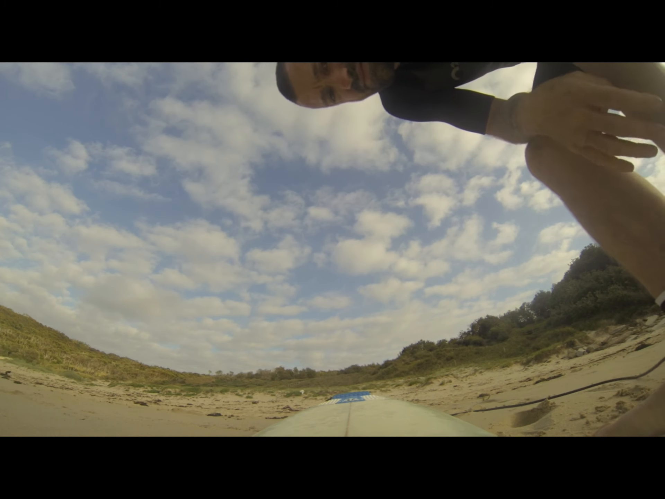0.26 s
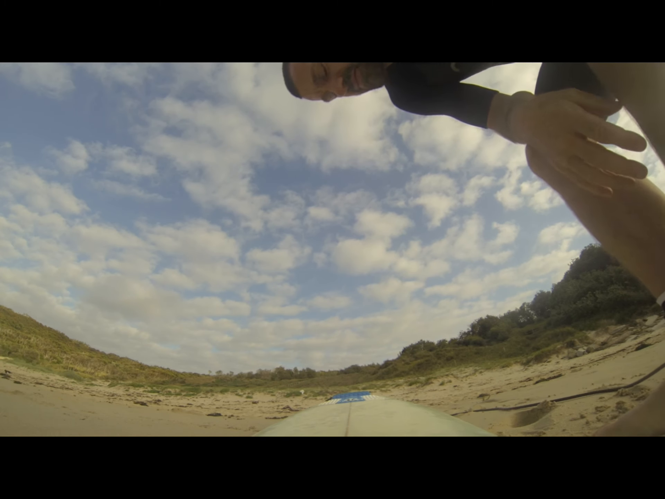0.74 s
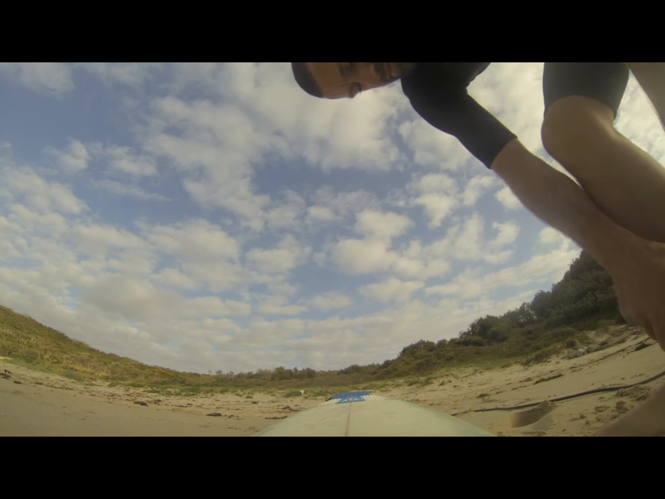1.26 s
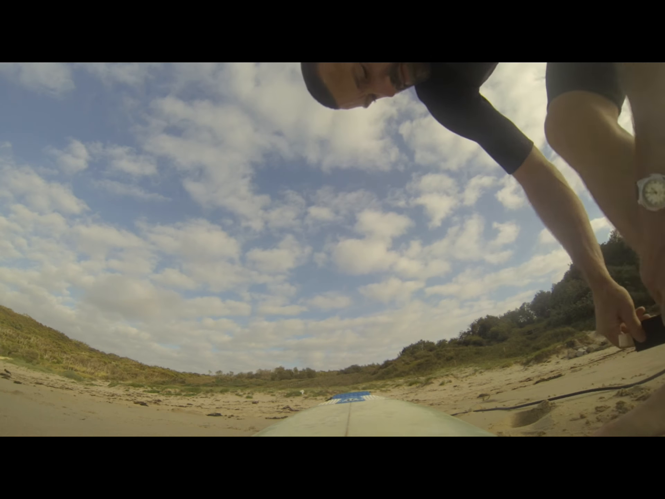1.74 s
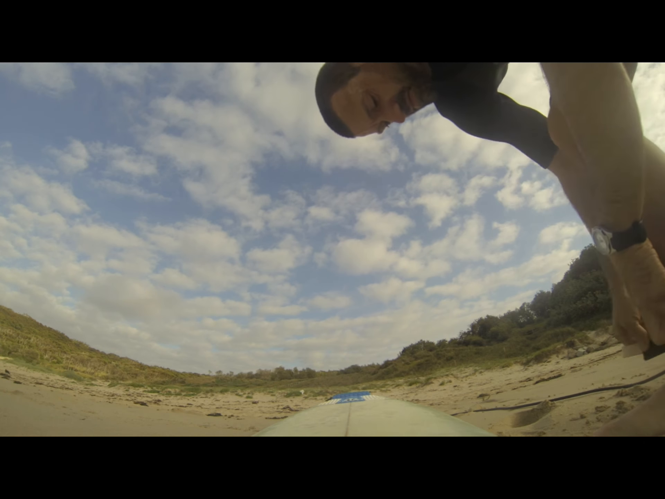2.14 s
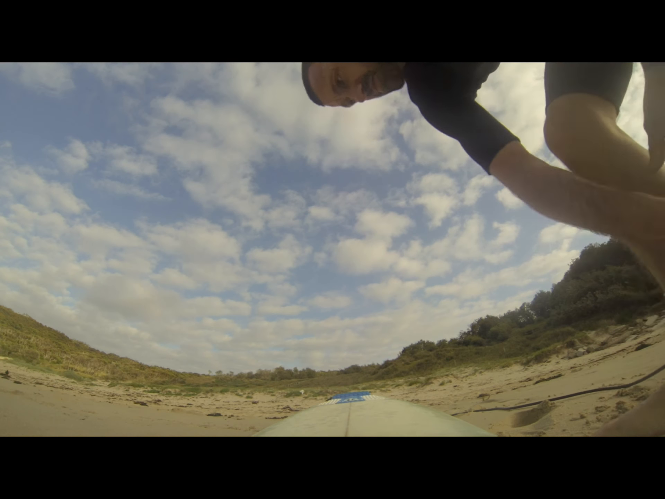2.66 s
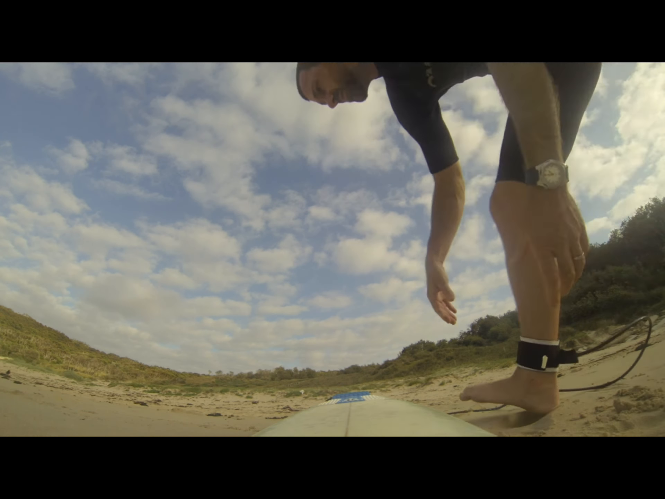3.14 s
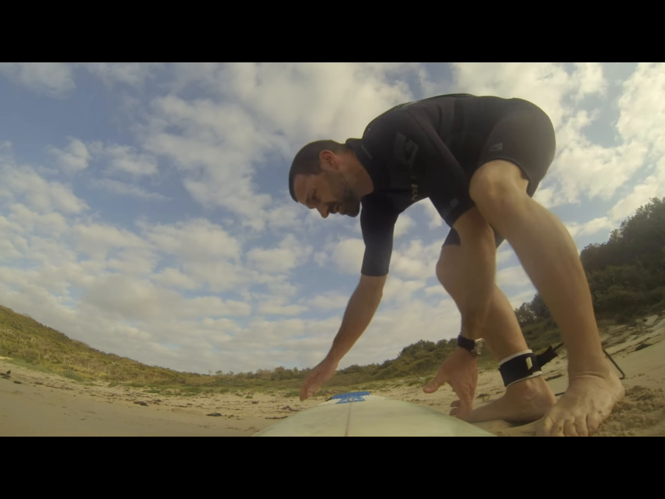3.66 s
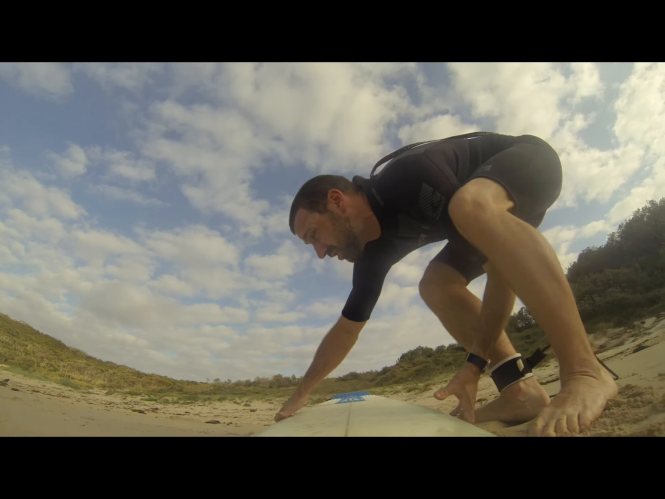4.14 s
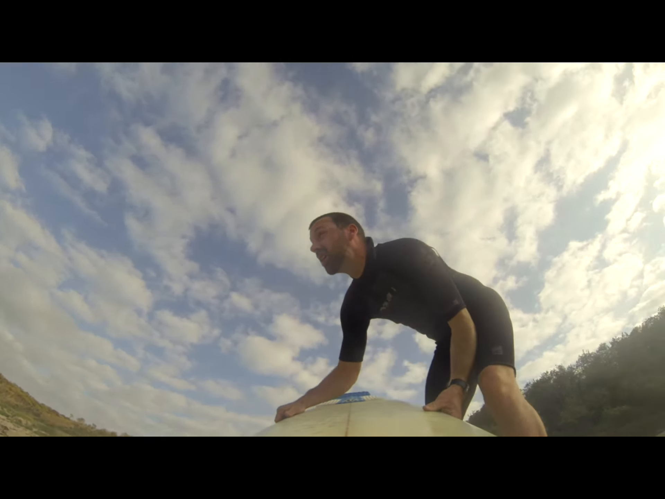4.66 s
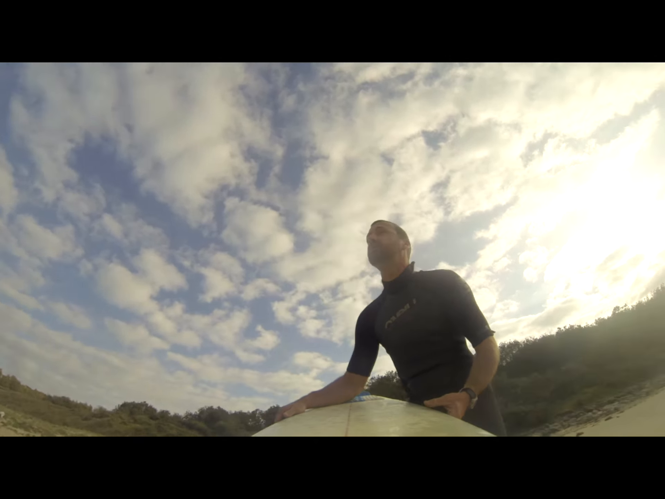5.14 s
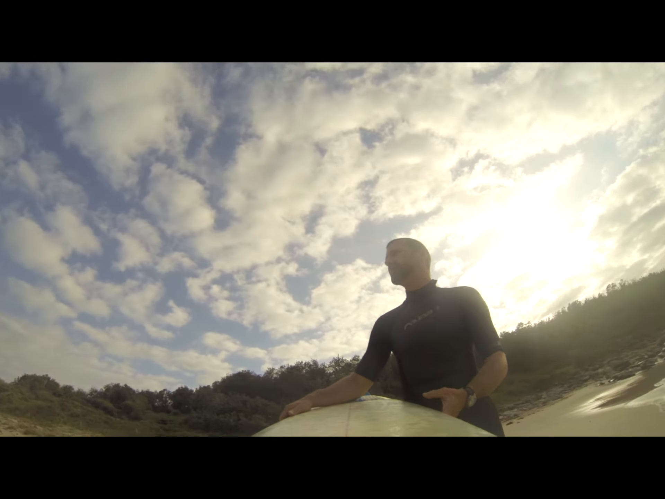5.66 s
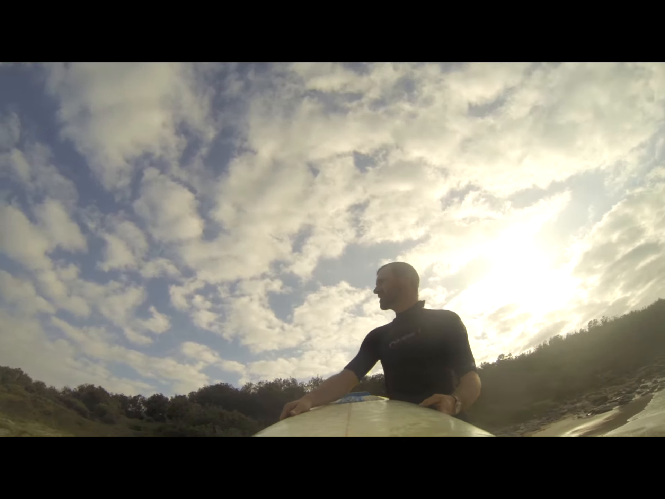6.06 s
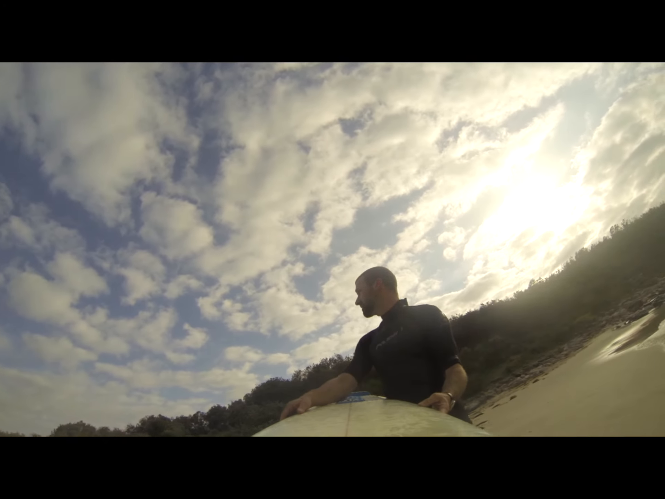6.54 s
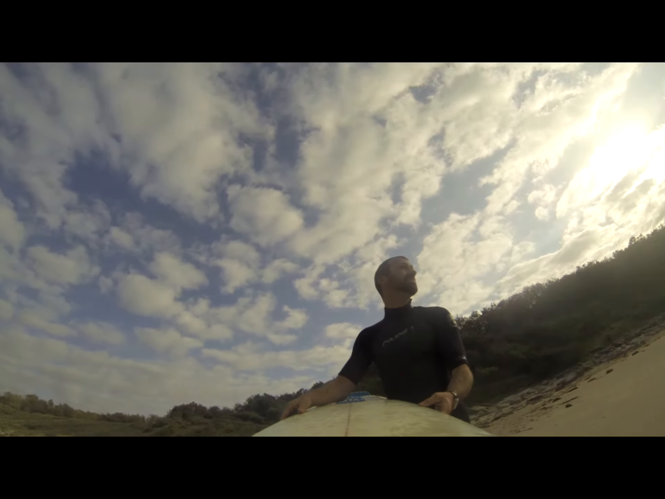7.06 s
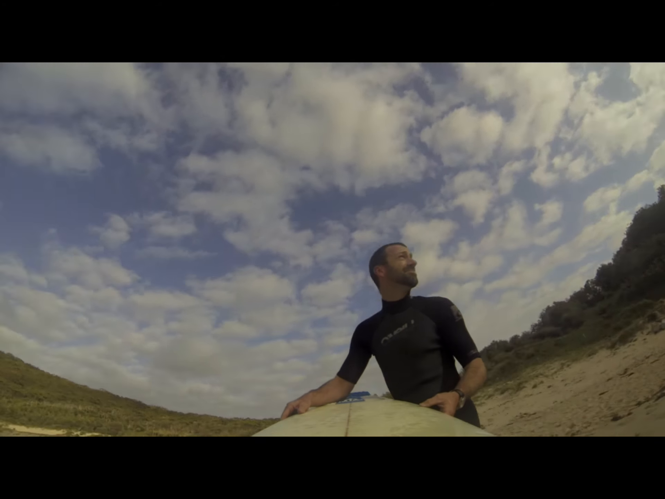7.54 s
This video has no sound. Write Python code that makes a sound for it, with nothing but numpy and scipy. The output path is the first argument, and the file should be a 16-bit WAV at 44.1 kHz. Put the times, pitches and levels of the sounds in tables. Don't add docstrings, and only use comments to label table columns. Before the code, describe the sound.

Heard from inside a sealed case fixed to a surfboard on a beach, foam hisses dully and recedes. A hook-and-loop strap rips in stuttering crackles, quiet and muffled. Then hands seize and lift the board: hollow plastic knocks, very low booms and jolts, dry ticks and palms rubbing sandy wax. The surf ducks after the hardest hits and climbs back. Creaks and two short squeaks come near the end.

```python
import sys
import numpy as np
from scipy import signal
from scipy.io import wavfile
from scipy.ndimage import uniform_filter1d

SR = 44100
rng = np.random.default_rng(int(sys.argv[2]) if len(sys.argv) > 2 else 0)


def gain_from_db(level_db):
    decades = np.asarray(level_db, float) / 20
    return 10 ** decades


def log_audio(samples):
    frames = np.atleast_2d(samples).T
    limited = np.clip(frames, -1, 1)
    pcm = np.round(limited * 32767).astype(np.int16)
    wavfile.write(sys.argv[1], SR, pcm)


N = 343980
T = np.arange(N) / SR

# t/s, level/dB, brightness/(dB per octave)
WASH = [(0, -36.5, -1), (.6, -35, 0.5), (1.2, -39.5, 0.5), (1.9, -49, -1), (2.5, -53.5, 1),
        (3.2, -51, -2.5), (3.9, -51.5, -2), (4.6, -38.5, -1.5), (5.199, -39.5, -2), (5.701, -50.5, 6),
        (6.3, -52, 4.5), (6.9, -45.5, 2.5), (7.4, -35, -2), (7.8, -41.5, 1.5)]
# f/Hz, level/(dB per Hz)
WALL = [(90, -7.5), (260, -10.5), (520, -7.5), (600, -13.5), (850, -17), (1120, -10.5), (1300, 2.5),
        (1520, -2), (1780, -11.5), (3100, -25), (3600, -26), (8500, -41), (14000, -60.5), (15700, -71.5)]
# f/Hz, width/Hz, level/dB
WALL_PEAKS = [(2322, 9.3, 7), (3023, 320, 8), (5040, 100, 8), (6500, 110, 5.5), (7730, 200, 4.5),
              (10200, 770, 3), (13500, 700, 0)]
# f/Hz, level/(dB per Hz)
ROAR = [(40, -10), (120, 0.5), (300, -2.5), (410, -2), (550, -6.5), (850, -17), (1400, -13), (2000, -31.5),
        (4000, -35), (9000, -41.5), (15000, -50), (15700, -75)]
ROAR_DB, WHINE_DB, WHINE_HZ = -48.5, -81, 10645
CARRY_S, CARRIED_WHINE_DB = 4.3, -5

# f/Hz, width/Hz
FLEX_MODES = [(24, 11.4), (50, 7.1), (74, 4.6), (115, 8.3)]
TREMOR_DB = [-8.5, -7, -3.5, -15.5]
# start t/s, level/dB
FEET = [
    (.25, -33.5),
    (0.618, -33),
    (.92, -34),
    (1.298, -43),
    (1.548, -46.5),
    (1.98, -49),
    (2.35, -47.5),
    (2.7, -53.5),
]
# start t/s, length/s, level/dB
HEAVES = [(0, 0.27, -34), (2.45, 0.51, -49.5), (3.67, 0.17, -37), (3.899, 0.11, -14), (4.2, .04, -23),
          (4.58, 0.31, -23.5), (4.85, 0.28, -25), (5.221, 0.1, -16), (5.42, 0.16, -21), (5.7, 0.18, -23),
          (6.1, 0.18, -42), (6.45, 0.26, -23), (7.129, 0.068, -23.5)]
# start t/s, length/s, level/dB, mode favoured by the grip (1-3)
SHOVES = [(3.216, 0.032, -27, 1.9), (3.643, 0.047, -23.5, 2), (3.893, 0.064, -22, 1.35),
          (4.056, .12, -19, 1.2), (4.201, 0.054, -18.5, 1.96), (4.285, 0.19, -31, 1.98),
          (4.561, 0.11, -21, 0.99), (4.705, 0.066, -16, 1.8), (4.798, 0.051, -15.5, 1.43),
          (4.873, 0.096, -16.5, 1.02), (5.03, 0.081, -21, 1.46), (5.156, 0.048, -17.5, 1.87),
          (5.405, 0.064, -17, 1.94), (5.512, 0.23, -22.5, 1.39), (5.869, .16, -16, 1),
          (5.98, 0.046, -24, 3.1), (6.079, .15, -18.5, 1.95), (6.287, 0.095, -19, 0.98),
          (6.429, 0.077, -13.5, 1.55), (6.56, 0.13, -26, 1.3), (6.729, 0.11, -20, 1.1),
          (6.867, 0.045, -8, 2.55), (6.956, 0.13, -24.5, 2.7), (7.157, 0.086, -18.5, 0.93),
          (7.373, 0.076, -15.5, 1.32), (7.47, 0.089, -23, 2.45), (7.621, 0.05, -16.5, 1.16),
          (7.683, 0.086, -7.5, 3.57)]
# t/s, peak level/dB, f/Hz, first swing (up +, down -)
JOLTS = [(3.646, -20, 90, -0.75), (3.699, -22.5, 101, 1), (3.897, -15, 55, 0.99), (4.08, 3, 72, 0.21),
         (4.212, -6, 59, -0.97), (4.2675, -3, 57, 0.92), (4.75, -12.5, 70, -1.53), (5.159, -9, 73, -0.93),
         (5.468, -10, 71.7, 0.45), (5.881, -10, 55, -0.9), (6.031, -8, 74.5, 1), (6.111, -8, 70, 0.9),
         (6.455, 4.5, 66.6, -0.12), (6.885, 1, 54, 0.59)]
LIFT_S, RESTING_HZ, RESTING_WIDTH = 3.85, 30, 8.8
FOOT_S, HEAVE_RISE_S, HEAVE_FALL_DB_PER_S = 0.19, 0.03, 145
SHOVE_RISE_S, SHOVE_FALL_DB_PER_S, NEXT_MODE_DB, THIRD_MODE_DB = 0.012, 152, -10, -11

# f/Hz, width/Hz, level/dB
DECK = [(178, 41, 5.5), (254, 2.1, -12), (284.4, 17.8, 6), (389, 6.9, -3), (430.7, 34, 11), (514.6, 65, 18),
        (606, 72, 8), (671, 17, -6.5)]
# f/Hz, width/Hz, level/dB
CASE = [(850, 130, 2), (1010, 250, -10), (1330, 60, 25), (1378, 59, 23), (1481, 63, 29), (1580, 80, 26),
        (1773, 25, 14.5), (1950, 450, -21.5)]
# f/Hz, width/Hz, level/dB
GRIT = [(2170, 630, 18.5), (2530, 620, 3.5), (2777, 110, 3), (3090, 43, -13.5)]
# f/Hz, width/Hz, level/dB
SPRAY = [(4110, 160, 0.5), (5130, 830, 1), (7500, 1800, -4.5)]
# t/s, case peak level/dB, deck level/dB, deck f/Hz, grit level/dB
KNOCKS = [(3.6457, -29.5, -40, 172, -59), (3.695, -21, -30, 253, -48), (3.727, -26, -47, 400, -48),
          (3.741, -29, -45, 400, -46), (3.865, -29.5, -36, 175, -54), (3.897, -31, -28.5, 264, -56),
          (3.9544, -19.5, -21, 269, -46), (4.131, -19, -25.5, 172, -54), (4.2182, -17.5, -18, 415, -54),
          (4.2661, -25.5, -32.5, 172, -49), (4.6406, -10.5, -12.5, 390, -51),
          (4.7375, -14.5, -21, 568, -41), (4.9288, -8, -43, 579, -49), (5.089, -11, -18, 544, -36),
          (5.4748, -10, -16, 511, -63), (5.877, -27, -29, 511, -52), (5.9532, -18, -15, 533, -51),
          (6.042, -2, -6, 640, -34.5), (6.875, -19, -22, 395, -49), (4.805, -26, -32, 500, -48),
          (4.6355, -26, -30, 450, -52), (5.081, -20, -30, 544, -44), (5.099, -13, -20, 560, -44),
          (5.435, -24, -14, 480, -55), (5.502, -19, -20, 500, -52), (6.025, -20, -22, 500, -50),
          (4.204, -23, -21.5, 450, -55), (4.152, -26, -35, 300, -49), (3.939, -26, -33, 290, -49),
          (.527, -45, -30, 510, -65)]
# t/s, peak level/dB
TICKS = [(3.698, -50), (3.73, -51), (3.74, -50), (3.865, -51), (3.964, -37), (3.975, -49), (3.986, -43),
         (4.008, -51.5), (4.032, -52), (4.081, -50), (4.0863, -37.5), (4.102, -52), (4.165, -51),
         (4.221, -39), (4.231, -44), (4.269, -36), (4.274, -34), (4.28, -36.5), (4.566, -55), (4.639, -52),
         (4.738, -52), (4.749, -45), (4.758, -42), (4.601, -54), (4.839, -45), (4.886, -48), (4.949, -48),
         (4.96, -50), (5.023, -46), (5.075, -45), (5.093, -45), (5.162, -43.5), (5.168, -42), (5.228, -51),
         (5.278, -49), (5.4715, -42), (5.494, -45), (5.8866, -41), (6.013, -40), (6.036, -41),
         (6.044, -33.5), (6.102, -48), (6.1152, -42.5), (6.122, -43), (6.46, -47), (6.507, -45),
         (6.9, -35.5), (7.213, -50)]

# start t/s, length/s, crackle level/dB, dull part level/dB
STRAP = [(1.311, .004, -57, -45), (1.324, 0.0071, -50.5, -40), (1.334, 0.0045, -51.5, -42),
         (1.346, 0.013, -48.5, -42), (1.362, .006, -54, -44), (1.372, .008, -44.5, -36),
         (1.382, .009, -51.5, -40), (1.395, .04, -49.5, -41), (1.437, .05, -51.5, -44),
         (1.491, 0.02, -50.5, -42), (1.517, .005, -51, -41), (1.531, .003, -56, -46),
         (1.539, .004, -55, -45), (1.548, 0.026, -50.5, -41), (1.577, 0.032, -48.5, -39),
         (1.608, .04, -46, -40), (1.649, .028, -43, -33), (1.685, .015, -46, -35), (1.703, .014, -51, -37),
         (1.721, .004, -54, -40), (1.729, .028, -51.5, -34), (1.765, .003, -58, -44),
         (1.775, .009, -55.5, -33), (1.788, .007, -57, -39), (1.81, .014, -54.5, -33),
         (2.315, .012, -66, -62), (2.459, 0.042, -60.5, -58), (2.545, .01, -66, -60)]
# f/Hz, level/(dB per Hz)
STRAP_TONE = [(900, -56), (1400, 6.5), (2000, -5), (3250, -7.5), (3550, -11.5), (6200, -12.5), (9000, -21),
              (14000, -30.5), (15600, -48)]
PULL_RISE_S, PULL_SWELL_DB_PER_S, PULL_FALL_DB_PER_S = 0.003, 30, 2500

# start t/s, length/s, pressure/dB, nearness to the mount/dB, sand level/dB
STROKES = [(3.708, 0.035, -49, 11, 12), (3.899, 0.09, -39.5, 1.5, 1), (4.037, .055, -38, 6, 4),
           (4.106, 0.084, -32, 0.5, -6.5), (4.183, 0.11, -36, -12, -14), (4.631, 0.04, -20.5, -21.5, -35),
           (4.737, 0.016, -24, -3, -6), (4.8, 0.31, -32.5, 0, -9), (5.04, 0.013, -31.5, 3, 5),
           (5.066, 0.033, -27, 9, 2.5), (5.115, 0.14, -23, -6, -32), (5.255, 0.13, -31, 4.5, -2),
           (5.401, 0.099, -24, -6.5, -17), (5.536, 0.16, -36, 1.5, -2), (5.932, 0.18, -29, -3, -7),
           (6.297, 0.16, -47, -14, -3), (6.662, 0.15, -30, -8, -17), (6.872, 0.09, -28, 3, -22),
           (6.955, 0.053, -30.5, 12, -18), (7.011, 0.072, -22.5, -1.5, -25), (7.075, 0.057, -23.5, 5, -21),
           (7.129, 0.099, -30, 4.5, -20), (7.246, 0.29, -37.5, 6.5, -10), (7.386, 0.062, -30, 0, -29),
           (7.638, 0.14, -20.5, -11, -33)]
# start t/s, length/s, level/dB
SIFTS = [
    (3.729, .015, -64),
    (4.62, 0.13, -67),
    (4.798, 0.14, -65),
    (5.0, .16, -65),
    (5.33, 0.086, -58.5),
    (5.523, .2, -63.5),
    (6.37, .3, -64.5),
    (7.3, 0.44, -62.5),
]
STROKE_RISE_S, STROKE_FALL_DB_PER_S = 0.013, 399
CARRY_DB, CARRY_MOUNT_DB, CARRY_SAND_DB = -41, -1.5, -2

# t/s of the jolt, fall/dB, hold/s
DUCKS = [
    (3.975, 8, .08),
    (4.087, 7, .07),
    (4.285, 25, .15),
    (4.765, 3, .03),
    (5.172, 6, .12),
    (5.95, 3, .02),
    (6.052, 8, .04),
    (6.125, 11, .07),
    (6.905, 16, .03),
]
RECOVERY_DB_PER_S = 72
NEAR_DUCK = 0.64

# start t/s, length/s, f/Hz, level/dB
SINGING = [
    (5.09, 0.03, 568, -19.5),
    (5.11, 0.047, 448, -19),
    (5.16, .06, 395, -24),
    (5.074, .04, 1580, -17),
    (5.128, .06, 520, -23),
    (5.19, .05, 545, -27),
    (5.15, .028, 315, -21),
    (5.166, 0.15, 254.5, -22.5),
    (5.424, 0.039, 266, -27.5),
    (7.018, 0.062, 280, -28.5),
]
# start t/s, length/s, f/Hz, level/dB, octave level/dB
SQUEAKS = [
    (7.061, 0.076, 715, -24.5, -31),
    (7.145, 0.061, 671, -18.5, -14),
]
SQUEAK_BOWL = 0.13
LET_GO_S, LET_GO_LENGTH_S, LET_GO_HZ, LET_GO_RISE, LET_GO_DB = 7.199, 0.0334, 1245, 0.49, -11.5
SING_SKEW, SAG_PER_S, SAG_FROM_HZ, SING_ROUGH_DB = 0.82, 3.5, 267, 0.5

# t/s, peak level/dB
CREAKS = [(6.662, -23), (6.668, -16.5), (6.675, -13), (6.682, -15), (6.688, -14), (6.695, -11),
          (6.705, -14), (6.71, -7), (6.715, -19), (6.724, -11), (6.731, -11), (6.739, -22), (6.763, -17),
          (6.782, -15), (6.789, -25), (6.8, -24), (7.631, -20), (7.649, -8), (7.666, -10), (7.677, -10),
          (7.683, -9), (7.688, -9), (7.692, -9), (7.698, -9), (7.704, -4), (7.709, -6), (7.715, -4.5),
          (7.721, -11), (7.726, -12), (7.733, -18), (7.742, -10), (7.76, -12), (7.776, -13), (7.794, -21)]
# f/Hz, width/Hz, level/dB
CREAK = [(398, 140, 3.5), (566, 200, 2), (704, 80, 1), (1030, 170, 1.5), (1273, 290, 11), (1423, 120, -5),
         (1586, 73, -28)]

# start t/s, end t/s, loss/dB
THINNED = [
    (4.56, 5.33, 9),
    (5.56, 5.61, 10),
    (6.13, 6.64, 8),
    (6.97, 7.26, 7),
]
THINNED_FROM_HZ, THINNED_FLUTTER = 11300, 0.6


def evened(x):
    return x / np.sqrt(np.mean(x ** 2) + 1e-20)


def steadied(x, span, share):
    power = uniform_filter1d(abs(x) ** 2, span) + 1e-12
    return evened(x / power ** (np.clip(share, 0, 1) / 2))


def read(points, hz):
    f, value = np.transpose(points)
    return np.interp(np.log(hz + 1), np.log(f + 1), value)


def add(mix, s, sound):
    part = mix[round(s * SR):][:len(sound)]
    part += sound[:len(part)]


def efforts(starts, lengths, db, rise_s, fall_db_per_s, swell_db_per_s=0):
    t = T[::64, None] - starts
    fall = fall_db_per_s * np.maximum(t - lengths, 0)
    swell = swell_db_per_s * np.clip(lengths - t, 0, lengths)
    power = np.clip(t / rise_s, 0, 1) ** 2 * gain_from_db(2 * (db - fall - swell))
    return np.interp(T, T[::64], np.sqrt(power.sum(axis=1)))


def hiss(db_of, patchy_db, flicker_db):
    frames, hz = N // 128 + 5, np.fft.rfftfreq(512, 1 / SR)[:, None]
    a, b, patches = rng.standard_normal((frames, 257, 3)).T
    patches = uniform_filter1d(patches, size=5, axis=0)
    patches = evened(uniform_filter1d(patches, size=24, axis=1))
    flicker = evened(uniform_filter1d(rng.standard_normal(frames), size=4))
    level_db = db_of(hz, np.arange(frames) * 128 / SR) + patchy_db * patches + flicker_db * flicker
    return signal.istft((a + 1j * b) * gain_from_db(level_db), nperseg=512, noverlap=384)[1][:N]


def resonate(x, hz, width):
    turn = np.exp(2j * np.pi * np.cumsum(hz * np.ones(len(x))) / SR)
    r = np.exp(-np.pi * width / SR)
    return 2 * turn * signal.lfilter([1 - r], [1, -r], x / turn)


def ring(modes, damping, edge_hz):
    t = T[:6000]
    rings = sum(gain_from_db(db) * np.exp(-np.pi * w * damping * t) * np.sin(2 * np.pi * hz * t) for hz, w, db in modes)
    passed = signal.butter(4, edge_hz, "bandpass", fs=SR, output="sos")
    return evened(signal.sosfilt(passed, rings))


def slips(per_s, spread_db):
    size = gain_from_db(spread_db * np.minimum(rng.exponential(1, N), 4)) * rng.choice([-1., 1.], N)
    return size * (rng.random(N) < per_s / SR)


def wall_peaks(hz):
    return sum(db * np.exp(-((hz - f) / w) ** 2) for f, w, db in WALL_PEAKS)


def surf():
    s, level_db, tilt = np.transpose(WASH)

    def through_wall(hz, t):
        return read(WALL, hz) + wall_peaks(hz) + np.interp(t, s, tilt) * np.log2((hz + 100) / 1400)

    def far(hz, t):
        return read(ROAR, hz) + 0.24 * wall_peaks(hz)

    foam_noise = steadied(hiss(through_wall, patchy_db=0.0, flicker_db=1.14), 20000, 0.58)
    foam = gain_from_db(np.interp(T, s, level_db)) * foam_noise
    roar = gain_from_db(ROAR_DB) * evened(hiss(far, patchy_db=-0.5, flicker_db=1.0))
    whine_gain = gain_from_db(WHINE_DB + CARRIED_WHINE_DB * (T > CARRY_S)) * np.sqrt(2)
    return foam + roar + whine_gain * np.sin(2 * np.pi * WHINE_HZ * T)


def bending():
    s, length, db, favoured = np.transpose(SHOVES)
    drive = [efforts(*np.transpose(HEAVES), HEAVE_RISE_S, HEAVE_FALL_DB_PER_S)]
    for k in range(1, 4):
        mode_db = db + NEXT_MODE_DB * abs(k - favoured)
        drive.append(efforts(s, length, mode_db, SHOVE_RISE_S, SHOVE_FALL_DB_PER_S))
    feet_s, feet_db = np.transpose(FEET)
    drive[2] = drive[2] + efforts(feet_s, FOOT_S, feet_db, HEAVE_RISE_S, HEAVE_FALL_DB_PER_S)
    drive[3] = drive[3] * gain_from_db(THIRD_MODE_DB)
    foam_db = np.interp(T, *np.transpose(WASH)[:2])
    return [np.hypot(d, gain_from_db(foam_db + db)) for d, db in zip(drive, TREMOR_DB)]


def flex():
    def shaken(hz, width):
        once = resonate(rng.standard_normal(N), hz, width).real
        twice = resonate(once, hz, 2.08 * width)
        return evened(steadied(twice, 1500, 0.79).real)

    modes = [shaken(hz, width) for hz, width in FLEX_MODES]
    lifted = np.clip((T - LIFT_S) / 0.037, 0, 1)
    modes[0] = lifted * modes[0] + (1 - lifted) * shaken(RESTING_HZ, RESTING_WIDTH)
    out = sum(gain * mode for mode, gain in zip(modes, bending()))
    for s, db, hz, swing in JOLTS:
        u = T[:4000] * hz
        wave = np.sin(2 * np.pi * u) - 0.12 * np.sin(6 * np.pi * u)
        shape = wave * np.tanh(6 * u) * np.exp(-3.5 * (u - 0.5) ** 2)
        add(out, s, swing * gain_from_db(db + 1.5) * shape)
    return out


def knocks():
    out, t = np.zeros(N + 7000), T[:500]
    fade = np.exp(-t / 0.0018)
    case, grit = ring(CASE, 1.63, [1080, 2300]), ring(GRIT, 3.8, [1600, 3600])
    blows = rng.standard_normal((len(KNOCKS), 500))
    for (s, case_db, deck_db, deck_hz, grit_db), blow in zip(KNOCKS, blows):
        woken = [(f, w, db - 14 * abs(np.log2(f / deck_hz))) for f, w, db in DECK]
        deck = ring(woken, 0.99, [220, 800])
        for body, db in ((case, case_db - 3.5), (deck, deck_db), (grit, grit_db + 10.0)):
            sound = signal.fftconvolve(blow * t * fade, body)
            add(out, s, gain_from_db(db) * sound / abs(sound).max())
    colour = signal.butter(1, [2500, 6000], "bandpass", fs=SR, output="sos")
    for (s, db), blow in zip(TICKS, rng.standard_normal((len(TICKS), 500))):
        tick = signal.sosfilt(colour, signal.sosfilt(colour, blow)) * fade
        add(out, s, gain_from_db(db - 1.5) * tick / abs(tick).max())
    return out[:N]


def strap():
    def tearing(hz, t):
        peaks = 1.3 * wall_peaks(hz) + 5.0 * np.exp(-((hz - 4050) / 150) ** 2)
        return read(STRAP_TONE, hz) + peaks - 9.0 * (t > 1.7) * (hz > 8200)

    tone = evened(hiss(tearing, patchy_db=1.5, flicker_db=1))
    tugs = abs(slips(per_s=1300, spread_db=2.0))
    clumps = signal.lfilter([1], [1, -0.985], tugs)
    crackle = steadied(tone * (0.6 + evened(clumps)), 1200, 0.53)
    body = ring(GRIT + [(3040, 130, 5.8)], 1.0, [1800, 3500])
    body = body + gain_from_db(-3) * ring(CASE[2:6], 1.3, [1100, 1800])
    dull = steadied(signal.oaconvolve(crackle, body)[:N], 1200, 0.47)
    s, length, db, dull_db = np.transpose(STRAP)

    def pull(level_db):
        return efforts(s, length, level_db, PULL_RISE_S, PULL_FALL_DB_PER_S, PULL_SWELL_DB_PER_S)

    return pull(db + 10.0) * crackle + pull(dull_db - 7.5) * dull


def rubbing():
    carry = (CARRY_S, N / SR, CARRY_DB, CARRY_MOUNT_DB, CARRY_SAND_DB)
    s, length, db, mount_db, sand_db = np.transpose(STROKES + [carry])
    drive = slips(per_s=700, spread_db=2.5) + 0.22 * rng.standard_normal(N)

    def press(level_db):
        return efforts(s, length, level_db, STROKE_RISE_S, STROKE_FALL_DB_PER_S)

    def rubbed(body):
        return steadied(signal.oaconvolve(drive, body)[:N], 1500, 0.077)

    deck = rubbed(ring(DECK, 1.1, [200, 1000]))
    case = rubbed(ring(CASE, 1.52, [880, 2300]))
    grit = rubbed(ring(GRIT, 1.0, [1900, 3500]) + gain_from_db(-16.0) * ring(SPRAY, 1.1, [3600, 10000]))
    sift_gain = efforts(*np.transpose(SIFTS), STROKE_RISE_S, STROKE_FALL_DB_PER_S)
    sift = sift_gain * rubbed(ring(SPRAY, 1.3, [4600, 9000]))
    palms = press(db - 1.5) * deck + press(db + mount_db - 3.0) * case
    return sift + palms + press(db + sand_db - 15) * grit


def ducking():
    falls = []
    for s, db, hold in DUCKS:
        recovered = RECOVERY_DB_PER_S * np.maximum(T - s - hold, 0)
        falls.append(np.clip(db - recovered, 0, None) * (T > s))
    return -uniform_filter1d(np.max(falls, axis=0), size=100)


def squeaks():
    out, waver = np.zeros(N), evened(uniform_filter1d(rng.standard_normal(N), size=300))

    def along(length):
        return np.linspace(0, 1, int(length * SR))

    def turns(s, hz, share):
        return 2 * np.pi * np.cumsum(hz * (1 + share * waver[round(s * SR):][:len(hz)])) / SR

    def grip(s, u):
        return SING_ROUGH_DB * waver[::-1][round(s * SR):][:len(u)]

    for s, length, hz, db, octave_db in SQUEAKS:
        u = along(length)
        a = turns(s, hz * (1 + SQUEAK_BOWL * abs(2 * u - 1) ** 2.7), 0.019)
        tone = gain_from_db(db) * np.sin(a) + gain_from_db(octave_db) * u * np.sin(2 * a)
        add(out, s, np.sin(np.pi * u) ** 0.58 * gain_from_db(0.5 * grip(s, u)) * tone)
    u = along(LET_GO_LENGTH_S)
    a = turns(LET_GO_S, LET_GO_HZ * (1 + LET_GO_RISE * u ** 1.49), 0.012)
    add(out, LET_GO_S, gain_from_db(LET_GO_DB) * np.sin(np.pi * u) ** 2.4 * np.sin(a))
    for s, length, hz, db in SINGING:
        u = along(length)
        a = turns(s, hz - SAG_PER_S * (hz - SAG_FROM_HZ) * length * u, 0.011)
        add(out, s, gain_from_db(db + grip(s, u)) * np.sin(np.pi * u ** SING_SKEW) * np.sin(a))
    return np.sqrt(2) * out


def creaks():
    out, t, rail = np.zeros(N), T[:200], ring(CREAK, 0.52, [250, 1800])[:1500]
    for (s, db), grain in zip(CREAKS, rng.standard_normal((len(CREAKS), 200))):
        slip = signal.fftconvolve(grain * t * np.exp(-t / 0.0007), rail)
        add(out, s, gain_from_db(db - 1.5) * slip / abs(slip).max())
    return out


def scene():
    fall_db = ducking()
    near = gain_from_db(NEAR_DUCK * fall_db) * rubbing() + strap() + flex() + creaks() + knocks() + squeaks()
    return (gain_from_db(fall_db) * surf() + near)[None]


def roll_off(x):
    return signal.sosfilt(signal.butter(12, 15000, fs=SR, output="sos"), x)


def record(dry):
    held = np.clip(dry, -1, 1)
    treble = signal.firwin(255, THINNED_FROM_HZ, pass_zero=False, fs=SR)
    top = signal.oaconvolve(held, treble[None], "same")
    flutter = 1 + THINNED_FLUTTER * np.repeat(rng.uniform(-1, 1, N // 1024 + 1), 1024)[:N]
    busy_db = sum(db * (T > a) * (T < b) for a, b, db in THINNED)
    loss_db = uniform_filter1d(flutter * busy_db, size=300)
    return roll_off(held - (1 - gain_from_db(-loss_db)) * top)


dry = scene()
out = record(dry)
log_audio(out)
```